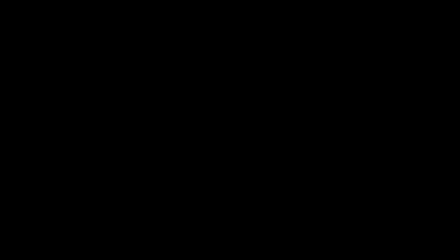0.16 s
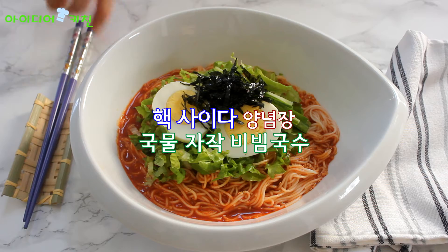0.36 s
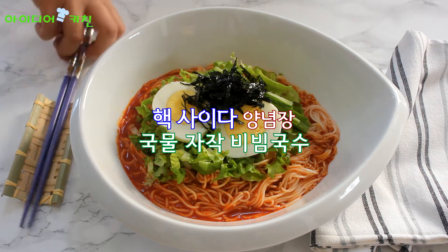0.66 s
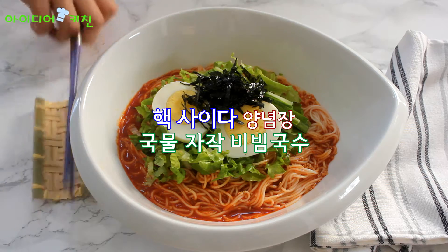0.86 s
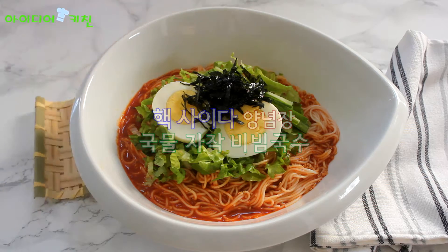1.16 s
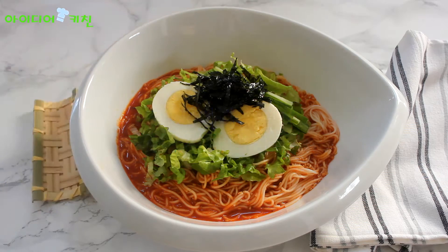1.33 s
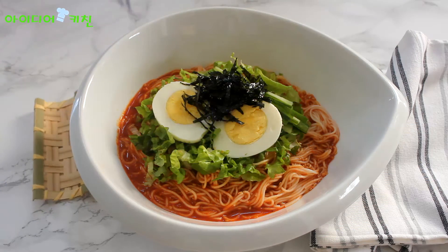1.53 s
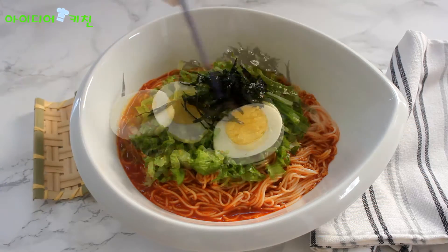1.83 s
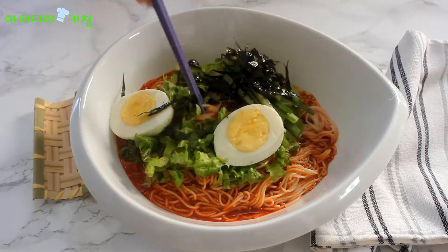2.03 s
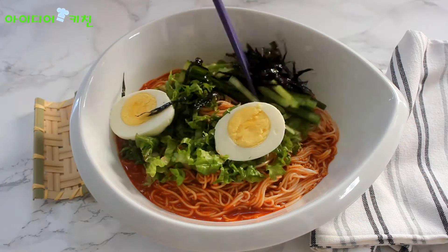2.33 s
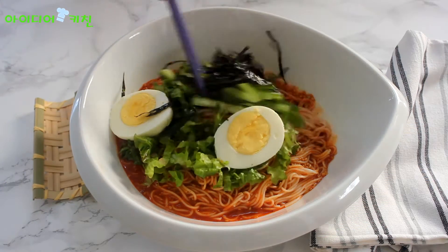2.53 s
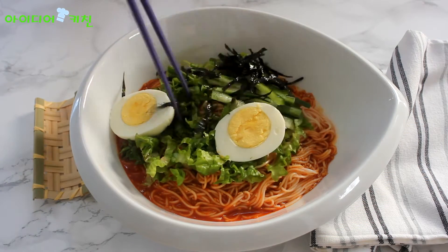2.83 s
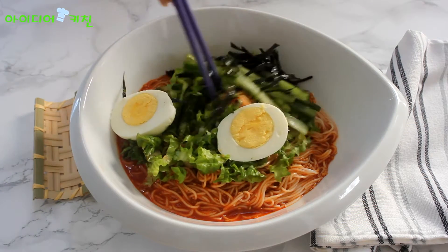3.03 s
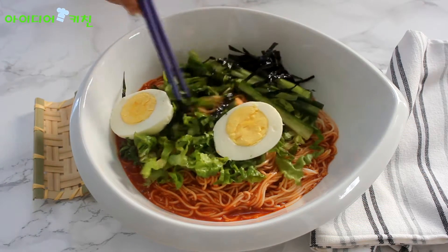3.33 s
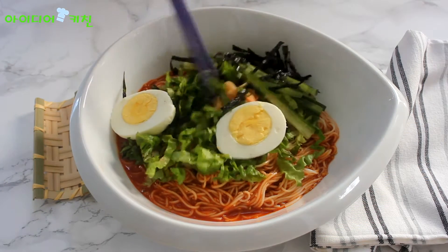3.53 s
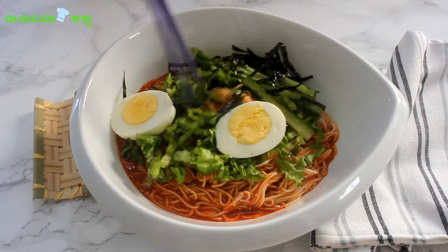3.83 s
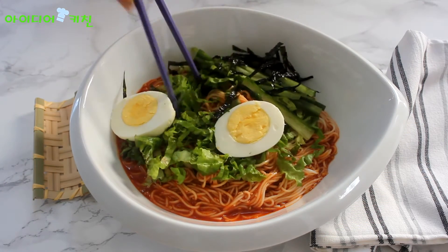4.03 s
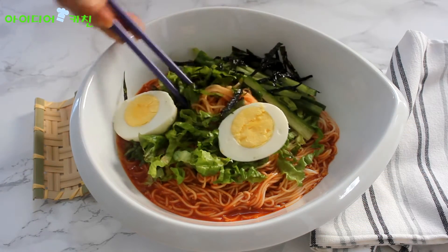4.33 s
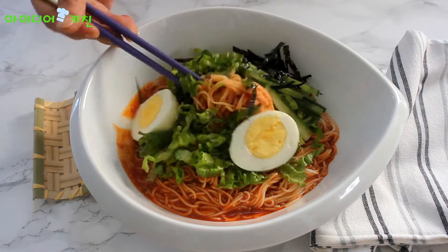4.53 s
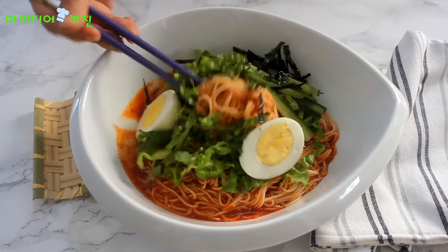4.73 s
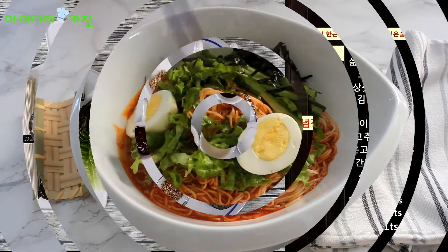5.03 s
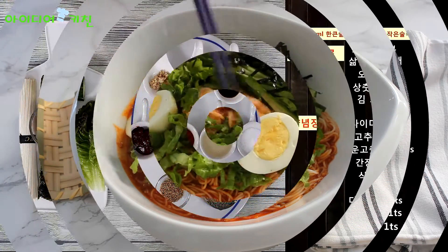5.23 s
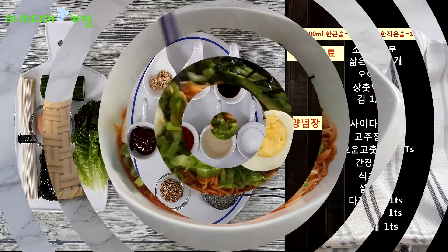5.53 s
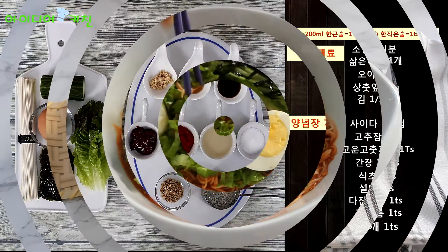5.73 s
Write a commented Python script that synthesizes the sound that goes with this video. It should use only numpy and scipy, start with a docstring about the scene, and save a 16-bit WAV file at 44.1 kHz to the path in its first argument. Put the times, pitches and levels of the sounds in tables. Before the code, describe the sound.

Sticks scrape and click off a woven rest, rap hard on the tabletop, then squelch and crackle softly through saucy noodles and leaves.

```python
"""Close microphone in a quiet kitchen, refrigerator humming; the sound opens after a short silence.
Chopsticks are picked off their woven rest: a short soft scrape, noise scuffs and ringing stick modes.
They slide through the fingers as swells of noise, then are knocked level on the table: struck modes and a blow.
The loose sticks clatter to rest and the bowl rings faintly; the microphone's limiter ducks under the knock.
Then the tips dig in wet noodles and salad: swelling crackle, bursting tone pops and a few sharp damped ticks."""
import sys
import numpy as np
from scipy import signal
from scipy.fft import rfft, irfft
from scipy.io import wavfile
from scipy.ndimage import minimum_filter1d

SR = 44100
rng = np.random.default_rng(int(sys.argv[2]) if len(sys.argv) > 2 else 0)


def put_to_file(sound):
    """Save the sound as 16-bit audio at rate SR, in the file named by the first command-line argument."""
    columns = np.atleast_2d(sound).T  # one column per channel
    safe = np.clip(columns, -1, 1)
    whole_steps = np.round(safe * 32767)
    wavfile.write(sys.argv[1], SR, whole_steps.astype(np.int16))


N = 259484
TIME = np.arange(N) / SR


def from_db(db):
    """Decibels to gain."""
    return 10 ** (np.asarray(db) / 20)


def rms_one(x):
    """Scale to rms 1."""
    return x / np.sqrt(np.mean(x ** 2) + 1e-20)


def at_hz(points, hz):
    """Read a table on a log-frequency axis."""
    f, value = np.transpose(points)
    return np.interp(np.log(np.maximum(hz, 1)), np.log(f), value)


def drift(rate):
    """Slow random wander: straight lines between `rate` random points per second, of spread 1."""
    knots = rng.standard_normal(2000)
    return np.interp(TIME * rate, np.arange(len(knots)), knots)


def low_cut(x, hz):
    """Small things radiate no bass."""
    high_pass = signal.butter(3, hz, "high", fs=SR, output="sos")
    return signal.sosfilt(high_pass, x)


def noise(spectrum, size):
    """Noise of rms 1: the given spectrum with random phases."""
    hz = np.arange(size // 2 + 1) * SR / size
    phases = np.exp(2j * np.pi * rng.random(len(hz)))
    return rms_one(irfft(from_db(at_hz(spectrum, hz)) * phases, size))


def burst(spectrum, t60, low_hz=450):
    """Many close resonances struck together and dying fast, made as decaying noise."""
    decay = from_db(-60 * TIME[:8192] / t60)
    return low_cut(noise(spectrum, size=8192) * decay, low_hz)


def pulse(spectrum):
    """One causal (minimum-phase) knock of unit energy with a given spectrum."""
    size = 2048
    hz = np.arange(size // 2 + 1) * SR / size
    cepstrum = irfft(np.log(from_db(at_hz(spectrum, hz))))
    # folding the cepstrum onto its first half puts all the energy after the start
    folded = 2 * cepstrum[:size // 2]
    return rms_one(irfft(np.exp(rfft(folded, size)))) / np.sqrt(size)


def ring(modes, scatter_db, pitch=1, low_hz=600, size=8192):
    """One blow on a set of decaying modes, each of random strength, in alternating polarity."""
    t, total = TIME[:size], 0
    for k, (hz, db, t60) in enumerate(modes):
        envelope = from_db(db + scatter_db * rng.normal() - 60 * t / t60)
        total = total + (-1) ** k * envelope * np.sin(2 * np.pi * hz * pitch * t)
    return low_cut(total, low_hz)


def add(track, s, sound):
    """Mix a sound into a track at time s."""
    part = track[int(s * SR):][:len(sound)]
    part += sound[:len(part)]


# stick against stick as they are picked up: start_s, level_db
PICK_UP_CLACKS = [(.592, -29.5), (.5995, -26), (.6030, -14), (.610, -12.5), (.680, -26), (.704, -22),
                  (.7096, -3.5), (.7118, -7), (.7237, -11), (.732, -24), (.750, -26), (.794, -33),
                  (1.243, -29.5)]
# bending modes of a stick: pitch_hz, level_db, t60_s
STICK_MODES = [(3730, -26.5, 0.033), (5190, -14.5, 0.03), (7150, -13.5, 0.025), (9190, -14, 0.025),
               (11430, -10.5, 0.023), (13850, -11, .012)]
# colour of the hard crack in clacks and ticks: frequency_hz, level_db_per_hz
CRACK_COLOUR = [(600, -1.5), (2000, -8.5), (3300, -21), (5500, 1.5), (10000, 1), (13000, 3), (16000, -6.5)]


def clacks(touches, crack_db=-7, crack_t60=0.01):
    """Each touch gives a hard crack and sets the sticks ringing; the grip shifts their pitch a little."""
    out = np.zeros(N)
    for s, db in touches:
        ringing = ring(STICK_MODES, scatter_db=1.5, pitch=1 + .01 * rng.normal())
        crack = from_db(crack_db) * burst(CRACK_COLOUR, crack_t60)
        add(out, s, from_db(db) * (ringing + crack))
    return out


# stick ends hit the table and bounce: start_s, level_db
TABLE_KNOCKS = [(1.5505, 11.5), (1.5655, -2.5), (1.5768, 3.5)]
# modes of the table top: pitch_hz, level_db, t60_s
TABLE_MODES = [(207.6, -49.5, .12), (296, -28, 0.018), (374, -46.5, 0.21), (819, -18.5, 0.043),
               (907, -18.5, 0.048), (1095, -10.5, 0.041), (1182, -1.5, 0.0132), (1384, -14.5, 0.048),
               (1800, -52, 0.058), (2260, -20.5, 0.027), (3170, -13.5, 0.005), (4680, -22.5, 0.0079)]
# colour of the blow that the table spreads through the room: frequency_hz, level_db_per_hz
BLOW_COLOUR = [(150, -13.5), (300, -18), (600, -9.5), (900, -0.5), (1300, 3.5), (1600, -1.5), (1900, 4.5),
               (2300, 0.5), (2700, -9), (3600, -16), (4400, -16), (7000, -24.5), (10000, -41.5),
               (16000, -23.5)]


def knock(blow_db=10):
    """The table's ringing modes and the sharp blow itself, returned apart."""
    modes, blows = np.zeros((2, N))
    for s, db in TABLE_KNOCKS:
        add(modes, s, from_db(db) * ring(TABLE_MODES, scatter_db=5.25, low_hz=245))
        add(blows, s, from_db(db + blow_db) * pulse(BLOW_COLOUR))
    return modes, low_cut(blows, 170)


# the loose sticks bounce ever quicker (each gap times BOUNCE_SHRINK) and weaker
CLATTER_DB, BOUNCE_S, BOUNCE_SHRINK, BOUNCE_LOSS_DB = -3.5, .0145, .86, 2.5
SECOND_STICK_LAG_S, SECOND_STICK_DB = 0.0041, 2.5   # lag before chance; level over the first stick
CLATTER_LOW_HZ = 8450   # bouncing on their hard ends, the sticks give only their highest ring


def bounces(count=8):
    """Both sticks bounce from the first knock on, one just behind the other: rows start_s, level_db."""
    s, touches = TABLE_KNOCKS[0][0], []
    for k in range(count):
        db = CLATTER_DB - BOUNCE_LOSS_DB * k
        second_s = s + SECOND_STICK_LAG_S * rng.uniform(0.44, 1.5)
        touches += [(s, db), (second_s, db + SECOND_STICK_DB)]
        s += BOUNCE_S * BOUNCE_SHRINK ** k
    return touches


def clatter():
    """The bouncing sticks clack on their hard ends, heard only in the highest treble."""
    return low_cut(clacks(bounces()), CLATTER_LOW_HZ)


# the woven rest shifts on the table: start_s, level_db
REST_NUDGES = [(.534, -39), (.602, -28.5), (0.682, -35), (0.712, -29.5), (.733, -28.5), (.797, -31.5),
               (.826, -43), (.872, -42)]
# colour of the rest's scuffs and drag: frequency_hz, level_db_per_hz
REST_COLOUR = [(250, -15), (550, -2.5), (780, -1.5), (1300, -1.5), (2200, -3.5), (5000, -9), (15000, -23)]
# hollow slats of the rest: pitch_hz, level_db, t60_s
SLAT_MODES = [(725, -13.5, 0.14), (824, -3.5, 0.11), (950, -14, .07), (1310, -10, 0.11)]
# the tips drag over the rest, harder and harder until they lift off
LIFT_S, DRAG_DB, DRAG_RISE_DB_PER_S, DRAG_FALL_DB_PER_S = 0.75, -45.5, 55, 78


def rest(scuff_db=-2):
    """Dull scuffs ring the slats of the rest, over a low scrape as the sticks leave it."""
    before_lift_db = DRAG_RISE_DB_PER_S * (LIFT_S - TIME)
    after_lift_db = DRAG_FALL_DB_PER_S * (TIME - LIFT_S)
    drag_db = DRAG_DB - np.maximum(before_lift_db, after_lift_db)
    out = from_db(drag_db) * low_cut(noise(REST_COLOUR, size=N), 500)
    for s, db in REST_NUDGES:
        slats = ring(SLAT_MODES, scatter_db=2, pitch=1 + .08 * rng.normal())
        scuff = from_db(scuff_db) * burst(REST_COLOUR, t60=0.044)
        add(out, s, from_db(db) * (slats + scuff))
    return out


SWELL_SHAPE = 1.73   # of every swell: 1 is pointed, 2 is round


def swell(s, length_s):
    """One movement: it gathers speed and slows again, at half strength at both ends of its length."""
    return .5 ** (np.abs(2 * (TIME - s) / length_s) ** SWELL_SHAPE)


# sticks slide through the fingers: middle_s, length_s, level_db
FINGER_SLIDES = [(0.707, 0.043, -36.5), (0.965, 0.14, -55), (1.139, 0.068, -49), (1.212, 0.02, -47),
                 (1.317, 0.095, -36.5), (1.529, 0.093, -39), (2.294, 0.17, -54.5), (4.068, 0.11, -52),
                 (4.911, .11, -56.5)]
# colour of skin sliding on the sticks: frequency_hz, level_db_per_hz
SKIN_COLOUR = [(880, -33.5), (1500, -11.5), (2080, -16), (2370, -14), (3380, -11), (7840, -12.5),
               (11400, -8), (16000, -8.5)]
# colour of a short soft scrape, mostly 2 to 6 kHz: frequency_hz, level_db_per_hz
SCRAPE_COLOUR = [(1500, -11), (2800, -5), (4500, -1), (8000, -17), (16000, -25)]
SCRAPE_S, SCRAPE_LENGTH_S, SCRAPE_DB = 0.5, 0.087, -54   # as the sticks first move


def slides():
    """Skin rubs along the sticks as noise that swells with speed; a short soft scrape swells as they first move."""
    strength = sum(from_db(db) * swell(s, length_s) for s, length_s, db in FINGER_SLIDES)
    sliding = strength * noise(SKIN_COLOUR, size=N)
    scrape = from_db(SCRAPE_DB) * swell(SCRAPE_S, SCRAPE_LENGTH_S) * noise(SCRAPE_COLOUR, size=N)
    return sliding + scrape


# small damped ticks: a finger touching a stick first, then contacts of the tips:
# start_s, level_db, brightness_db_per_octave, pitch_ratio
DAMPED_TICKS = [(.5145, -40, -6, 0.41), (4.094, -14.5, -0.5, 1.005), (4.0995, -22, -2.5, 1.14),
                (4.1073, -34.5, 2, 0.54), (4.543, -37, -4, 0.88), (5.7213, -32, -4.5, 1.22),
                (5.7692, -21.5, 2, 0.86)]
# modes of a tip's quickly damped tick: pitch_hz, level_db, t60_s
TICK_MODES = [(886, -12, 0.0031), (1610, -6.5, 0.0086), (2100, -14, 0.0062), (2836, -11, 0.016),
              (3820, -13, 0.011), (6880, 3, 0.0024), (8940, 6, 0.0025), (12600, 10.5, 0.0017)]


def ticks(crack_db=-7):
    """Each tick rings quickly damped modes, tilted by brightness around 7 kHz, over a crack."""
    out = np.zeros(N)
    for s, db, tilt_db, pitch in DAMPED_TICKS:
        modes = [(hz, level + tilt_db * np.log2(hz / 7000), t60) for hz, level, t60 in TICK_MODES]
        crack = from_db(crack_db) * burst(CRACK_COLOUR, t60=.009)
        add(out, s, from_db(db) * (ring(modes, scatter_db=3.5, pitch=pitch) + crack))
    return out


# the tips are in the food: start_s, end_s
FOOD_DIGS = [(1.75, 4.96), (5.24, 7.7)]
DIG_FADE_S = 0.052


def digging():
    """1 while the tips are in the food, 0 while they are out, with short fades."""
    inside = 0
    for start, end in FOOD_DIGS:
        edge_s = np.minimum(TIME - start, end - TIME)
        inside = inside + np.clip(edge_s / DIG_FADE_S + .5, 0, 1)
    return inside


# strokes of the tips through the food: middle_s, length_s, wet_squelch_db, leaf_rustle_db
FOOD_STROKES = [(2.5, 0.099, -45, -43.5), (2.623, 0.056, -56, -46), (2.973, 0.16, -57, -43),
                (3.102, 0.069, -52.5, -44), (3.29, 0.14, -47, -64), (3.47, 0.089, -45.5, -71),
                (3.716, .11, -50.5, -54), (4.172, 0.38, -51.5, -56.5), (4.437, .06, -42.5, -73),
                (4.547, 0.11, -50.5, -55), (4.79, 0.084, -46, -48.5), (5.278, 0.073, -48.5, -71),
                (5.392, 0.059, -48.5, -46), (5.527, 0.14, -56.5, -45), (5.742, 0.12, -45, -45)]
DIG_WET_DB, DIG_LEAF_DB = -60.5, -57.5   # light contact between strokes


def food_levels():
    """Gains of squelch and rustle: light contact while digging, and a swell with each stroke."""
    inside = digging()
    wet, leafy = from_db(DIG_WET_DB) * inside, from_db(DIG_LEAF_DB) * inside
    for s, length_s, wet_db, leaf_db in FOOD_STROKES:
        speed = swell(s, length_s)
        wet = np.hypot(wet, from_db(wet_db) * speed)
        leafy = np.hypot(leafy, from_db(leaf_db) * speed)
    return wet, leafy


# small pops come by chance; their dB count from the wet gain
SMALL_POPS_PER_S, SMALL_POP_DB, SMALL_POP_SPREAD_DB = 36, 11.5, 4
SMALL_POP_LOW_HZ, SMALL_POP_HIGH_HZ = 2710, 9850


def small_pops(wet, count=300):
    """Chance pops of any pitch, stronger where the squelch is: rows start_s, level_db, pitch_hz."""
    wait, pitch, strength = rng.random((count, 3)).T
    times = FOOD_DIGS[0][0] + np.cumsum(-np.log(1 - wait)) / SMALL_POPS_PER_S
    squelch_db = 20 * np.log10(np.interp(times, TIME, wet) + 1e-9)
    levels = squelch_db + SMALL_POP_DB + SMALL_POP_SPREAD_DB * (2 * strength - 1)
    pitches = SMALL_POP_LOW_HZ * (SMALL_POP_HIGH_HZ / SMALL_POP_LOW_HZ) ** pitch
    return [row for row in zip(times, levels, pitches) if row[0] < TIME[-1]]


# the loudest pops of sauce films and leaves: start_s, level_db, pitch_hz
LOUD_POPS = [(1.8417, -28, 7570), (1.949, -30, 5640), (2.0063, -32, 12700), (2.3166, -32, 5260),
             (2.4022, -28, 6000), (2.4307, -32, 6110), (2.605, -28, 7940), (2.9325, -28, 5670),
             (2.9448, -27, 9000), (2.979, -28, 8000), (3.0055, -27.5, 8900), (3.0612, -27, 8370),
             (3.1398, -26, 8200), (3.4185, -27, 12100), (3.5643, -21.5, 10000), (3.8327, -28, 5450),
             (4.1753, -30, 7110), (4.4458, -27, 7760), (5.3154, -28.5, 6200), (5.471, -27.5, 10800),
             (5.499, -27.5, 5920), (5.5414, -31, 4760), (5.6527, -30, 4500), (5.8341, -27.5, 4840),
             (2.2867, -31, 3710), (3.0999, -28, 3290), (3.1602, -35, 3950), (3.6441, -35.5, 1900),
             (4.4318, -39.5, 2290), (5.8641, -33, 3820)]


def pops(wet, tone_db=-2, splash_db=-9):
    """A film bursts: a tiny cavity swells and dies within a few cycles, over a short splash."""
    out = np.zeros(N)
    for s, db, hz in list(LOUD_POPS) + small_pops(wet):
        cycles = TIME[:8192] * hz
        envelope = cycles / 2 * np.exp(1 - cycles / 2)   # peaks after two cycles
        tone = envelope * np.sin(2 * np.pi * cycles)
        splash_colour = [(800, -18), (hz / 2, -5), (hz, 0), (2 * hz, -6), (4 * hz, -20)]
        splash = burst(splash_colour, t60=.014)
        add(out, s, from_db(db) * (from_db(tone_db) * tone + from_db(splash_db) * splash))
    return out


def crackle(spectrum, per_s, spread_db, smooth_db, width_hz=1700):
    """Clumps of tiny bursts, each in one of 18 pitch bands, over a smooth rubbing hiss; rms 1."""
    born = rng.random(N) < per_s * from_db(4 * drift(35)) / SR   # the wandering rate makes the clumps
    size_db = spread_db * np.minimum(rng.exponential(1, N), 3.5)
    sizes = born * from_db(size_db) * rng.choice([-1, 1], N)
    pitches, dealt, out = np.linspace(1600, 15500, 18), rng.integers(0, 18, N), 0
    for k, hz in enumerate(pitches):
        b, a = signal.iirpeak(hz, hz / min(width_hz, hz / 2), fs=SR)
        impulses = sizes * (dealt == k) + 1e-18
        grains = signal.lfilter(b, a, signal.lfilter(b, a, impulses))
        out = out + from_db(at_hz(spectrum, hz)) * grains
    hiss = from_db(smooth_db) * noise(spectrum, size=N)
    return rms_one(rms_one(out) + hiss)


# colour of wet noodles: frequency_hz, level_db_per_hz
SQUELCH_COLOUR = [(1500, -5.5), (3500, -2), (7000, -3), (10000, -8), (16000, -12)]
# colour of rustling leaves: frequency_hz, level_db_per_hz
LEAF_COLOUR = [(1400, -30), (3000, -3.5), (7000, -18.5), (10000, -5), (13500, -1), (16000, -1)]
# the mass of noodles gives way with a dull push: frequency_hz, level_db_per_hz
MUSH_COLOUR = [(400, -9), (850, 2.5), (1500, 0.5), (3000, -25)]


def stirring(wet, leafy, squelch_db=-1, leaves_db=-3, mush_db=-12):
    """Wet noodles squelch and give way, and leaves rustle, as the sticks move."""
    wet_crackle = crackle(SQUELCH_COLOUR, per_s=1600, spread_db=7.0, smooth_db=-7.5)
    leaf_crackle = crackle(LEAF_COLOUR, per_s=1800, spread_db=11, smooth_db=-32)
    squelch = wet * from_db(squelch_db) * wet_crackle
    rustle = leafy * from_db(leaves_db) * leaf_crackle
    mush = wet * from_db(mush_db + 1.7 * drift(60)) * noise(MUSH_COLOUR, size=N)
    return low_cut(squelch + rustle + mush, 550)


# the ceramic bowl, shaken through the table: pitch_hz, level_db, t60_s
BOWL_MODES = [(960, -24, 0.39), (1184, -34, 0.322), (1793, -31.5, 0.205), (2630, -50, 0.32),
              (4290, -40, 0.48)]


def bowl():
    """The first knock leaves the bowl ringing faintly."""
    out, (s, db) = np.zeros(N), TABLE_KNOCKS[0]
    add(out, s, from_db(db) * ring(BOWL_MODES, scatter_db=3.0, size=SR))
    return out


# decay of the kitchen's echoes: frequency_hz, t60_s
KITCHEN_T60 = [(150, 0.61), (600, .52), (2000, 0.61), (6000, 0.62), (14000, 0.27)]


def kitchen(x, build_s=0.0016):
    """Diffuse echoes of unit energy that build up quickly and die band by band."""
    t, edges, tail = TIME[:SR], np.geomspace(100, 18000, 11), 0
    for low, high in zip(edges, edges[1:]):
        band_pass = signal.butter(2, [low, high], "band", fs=SR, output="sos")
        band = signal.sosfilt(band_pass, rng.standard_normal(SR))
        t60 = at_hz(KITCHEN_T60, np.sqrt(low * high))
        tail = tail + band * from_db(-60 * t / t60)
    tail = tail * (1 - np.exp(-t / build_s))
    return signal.fftconvolve(x, rms_one(tail) / np.sqrt(SR))[:N]


# refrigerator tones: pitch_hz, rms_level_db (before wavering), wavering_share
FRIDGE_TONES = [(57.8, -59.5, 0.11), (71, -67, 0.12), (115.6, -64.5, 0.37), (174, -62, 0.35),
                (202.2, -52, 0.18), (239.4, -59, 0.136), (434, -72.5, 0.37), (588, -67, 0.14),
                (1407, -71, 0.53)]
# colour of the room's air: frequency_hz, level_db_per_hz
AIR_COLOUR = [(20, -55.5), (40, -31), (52, -2), (130, -6.5), (220, -5), (380, -1.5), (600, -8),
              (1000, -11.5), (1600, -16), (3000, -23.5), (7000, -28.5), (16000, -31.5)]
AIR_DB = -51.5   # rms


def background():
    """Wavering motor and mains tones over the air of the room."""
    hum = 0
    for hz, db, waver in FRIDGE_TONES:
        wavering = 1 + waver * (drift(14) + 1j * drift(15))   # in level and phase
        carrier = np.exp(2j * np.pi * (hz * TIME + rng.random()))
        hum = hum + from_db(db) * np.sqrt(2) * np.real(wavering * carrier)
    return hum + from_db(AIR_DB) * noise(AIR_COLOUR, size=N)


def scene():
    """Sounds in the bowl are close and dry; the wide table top fills the room."""
    sticks = clacks(PICK_UP_CLACKS) + clatter()
    scuffs, tips = rest(), ticks()
    table, blows = knock()
    slide = slides()
    wet, leafy = food_levels()
    food = pops(wet) + stirring(wet, leafy)
    to_room = from_db(-13.0) * sticks + from_db(-6.5) * scuffs
    to_room += from_db(-17.5) * table + from_db(3.0) * blows
    to_room += from_db(-16.5) * tips + from_db(-18.5) * (food + slide)
    direct = sticks + scuffs + table + from_db(-16) * blows + bowl() + slide + tips + food
    return (direct + kitchen(to_room) + background())[None]


def limiter(x, threshold_db=-1, hold_s=0.098, release_db_per_s=90, attack_s=0.0042):
    """The gain drops under a peak within milliseconds, waits, then climbs back."""
    over = np.maximum(20 * np.log10(np.abs(x) + 1e-9) - threshold_db, 0)
    size = int(hold_s * SR)
    # the largest overshoot of the past hold time
    held = -minimum_filter1d(-over, size, origin=(size - 1) // 2)
    climb_db = release_db_per_s * TIME
    released = np.maximum.accumulate(held + climb_db) - climb_db
    r = np.exp(-1 / (attack_s * SR))
    reduction_db = signal.lfilter([1 - r], [1, -r], released)
    return x * from_db(-reduction_db)


START_S, CUTOFF_HZ = .376, 16000


def record(dry):
    """Sound opens after a short silence; the limiter acts, peaks clip, the top is cut."""
    opened = limiter(dry[0]) * (TIME > START_S)
    clipped = np.clip(opened, -1, 1)
    top_cut = signal.ellip(10, .1, 70, CUTOFF_HZ, fs=SR, output="sos")
    return signal.sosfilt(top_cut, clipped)[None]


dry = scene()
out = record(dry)
put_to_file(out)
```